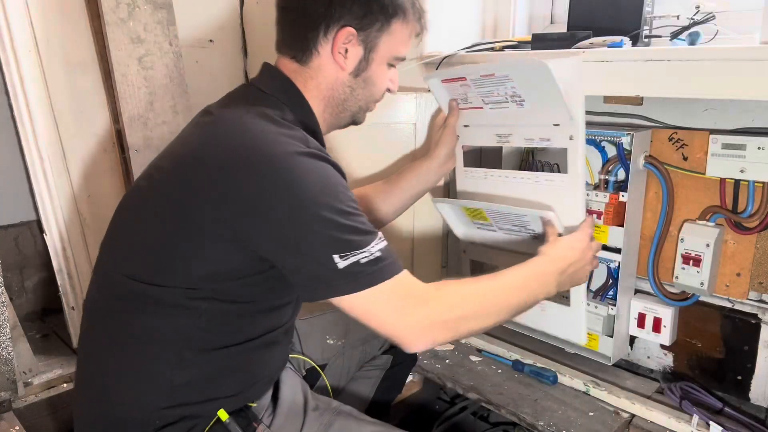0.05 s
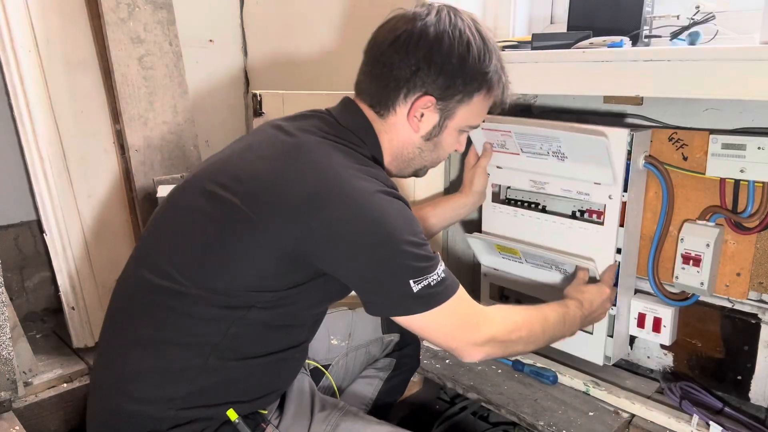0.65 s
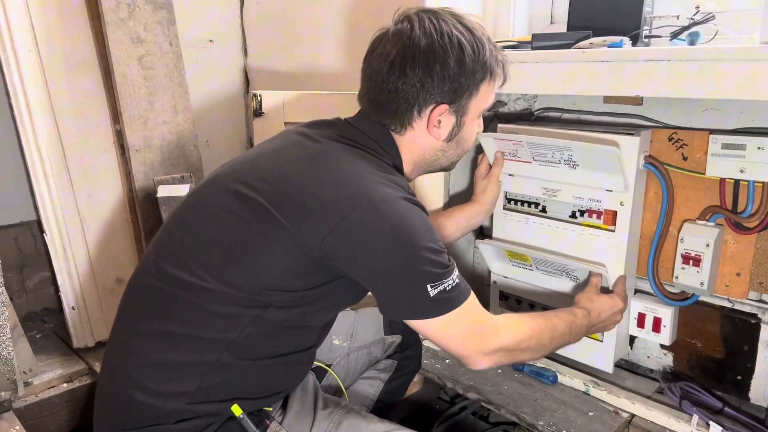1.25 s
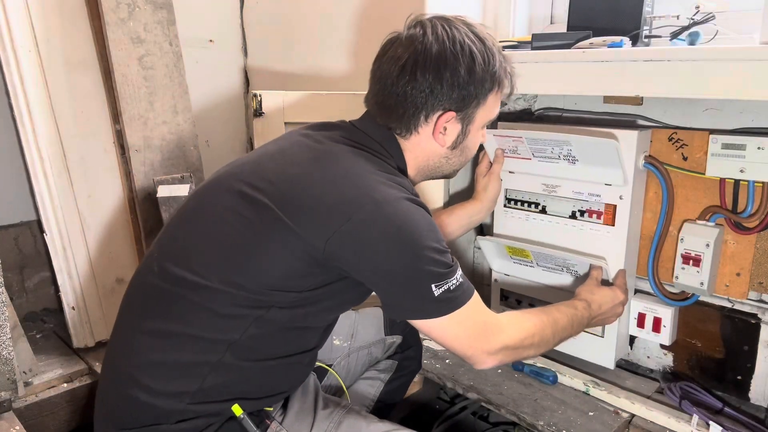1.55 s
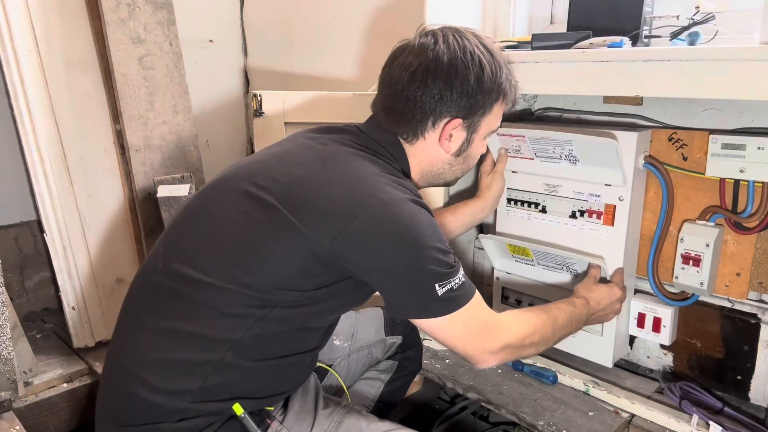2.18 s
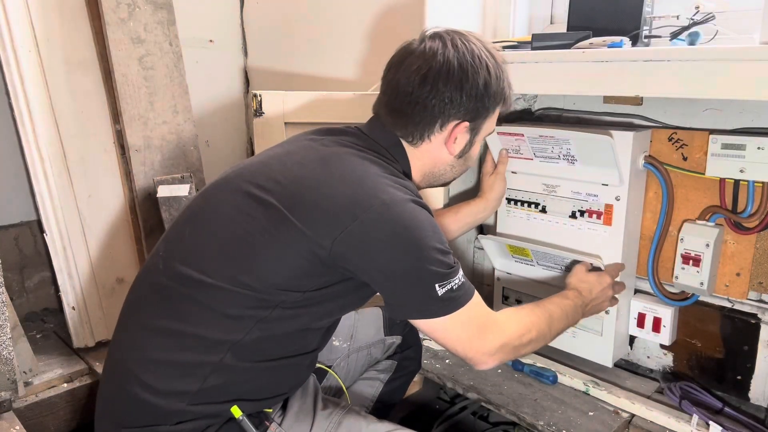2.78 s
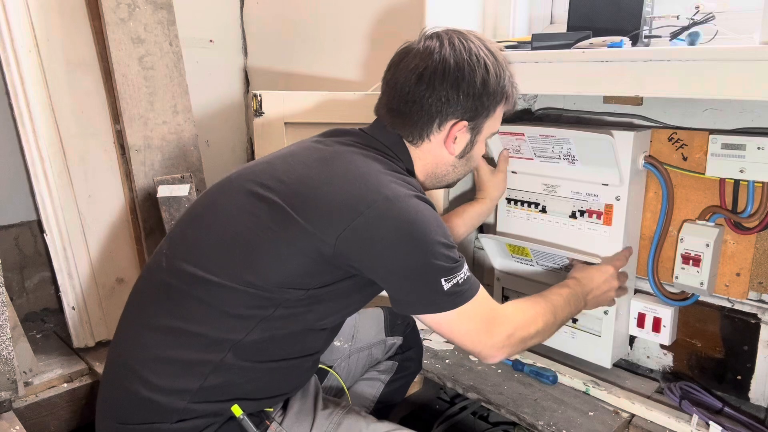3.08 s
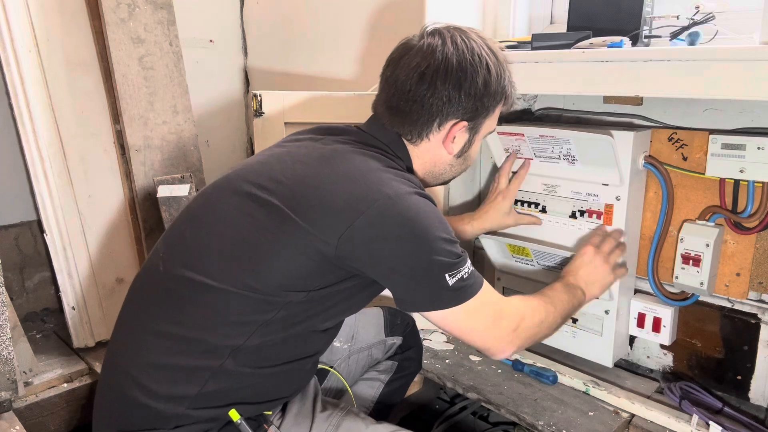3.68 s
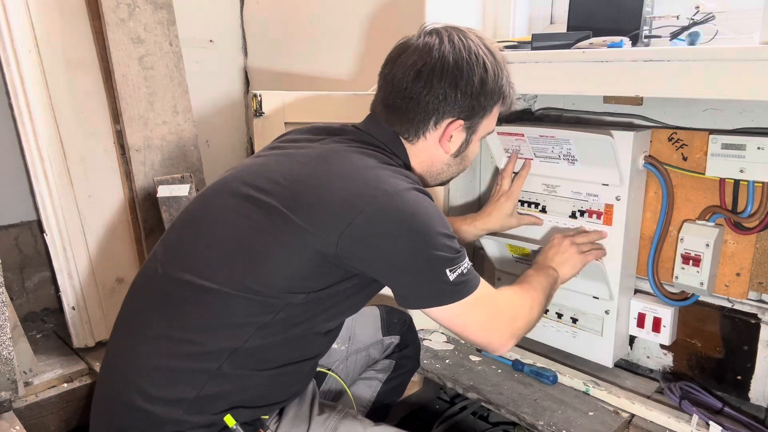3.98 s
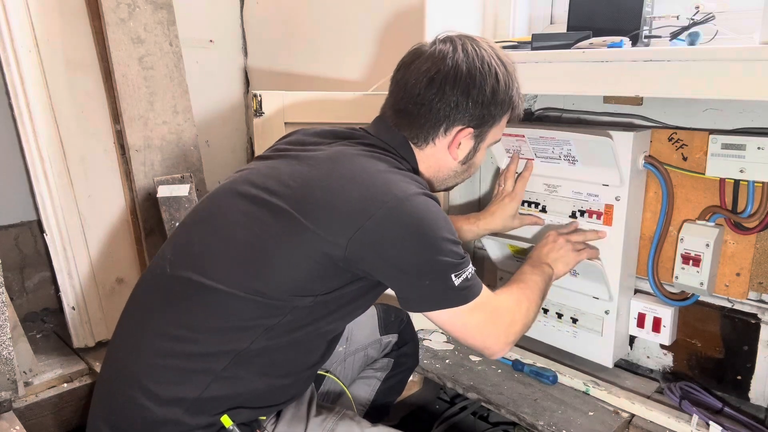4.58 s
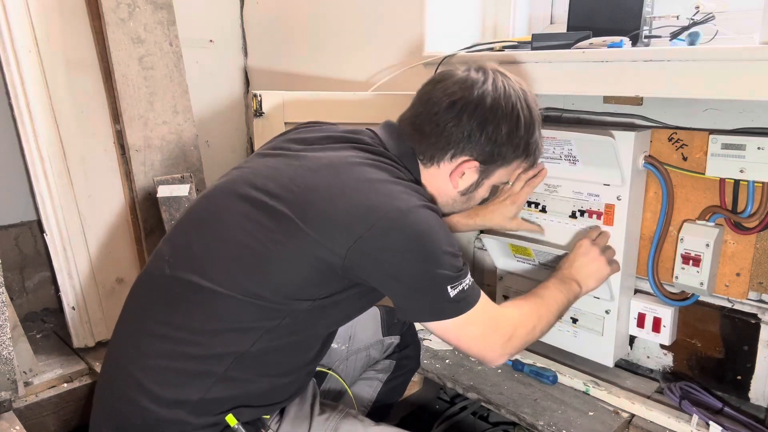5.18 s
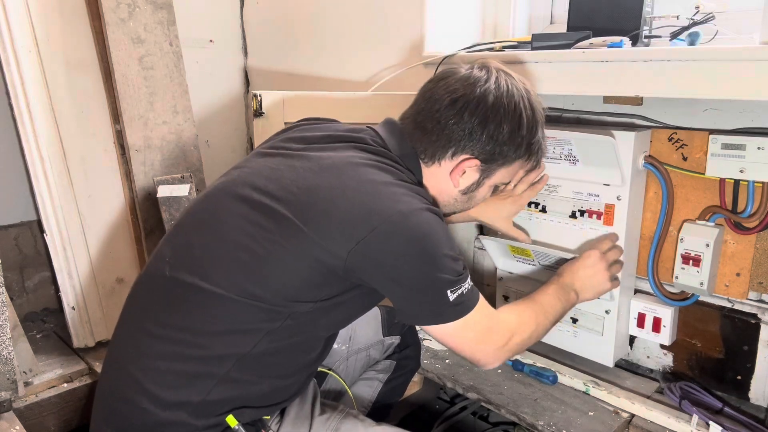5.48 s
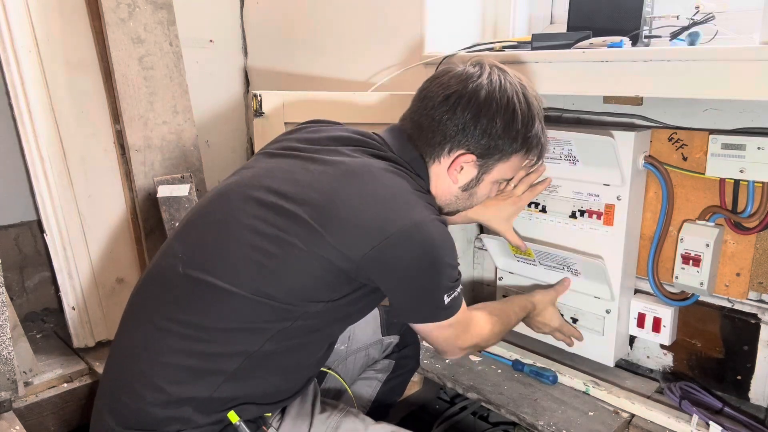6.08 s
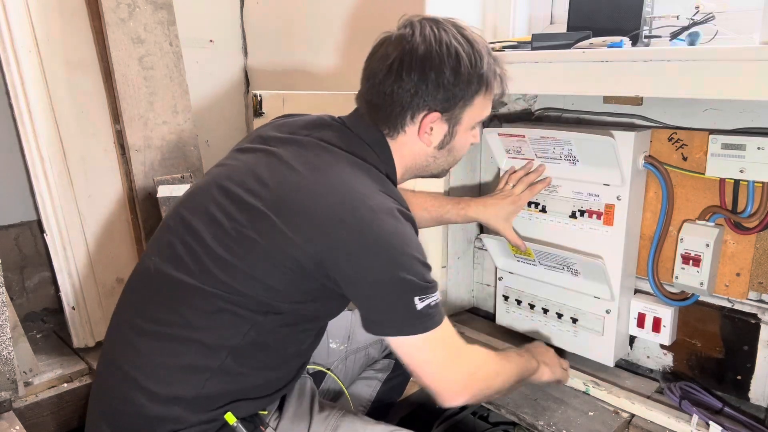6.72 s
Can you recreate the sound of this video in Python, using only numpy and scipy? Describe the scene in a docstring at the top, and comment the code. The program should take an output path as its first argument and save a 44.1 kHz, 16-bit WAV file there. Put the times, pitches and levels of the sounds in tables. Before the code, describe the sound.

A plastic cover taps and scrapes against a fuse box, bangs into place, then a small lid snaps shut in a bare room.

```python
"""A plastic cover scrapes, knocks, groans and bangs home on a wall-mounted fuse box in a small bare room.
Its hinged lid clicks and snaps shut, a hand tool knocks on the boards, and the floor thuds under a knee.
Each impact is a broadband excitation shaped by the resonances of the struck body; a harder blow tilts
the spectrum towards the treble. Stick-slip friction makes the groans, and freely decaying modes ring on.
Sleeves rustle between the blows and a faint squeak glides twice, over quiet room tone and hiss."""
import sys
import numpy as np
from scipy import signal
from scipy.fft import rfft, irfft, next_fast_len
from scipy.io import wavfile
from scipy.ndimage import map_coordinates

SR = 44100
rng = np.random.default_rng(int(sys.argv[2]) if len(sys.argv) > 2 else 0)


def waveform_to_disk(signal):
    """Save audio, clipped to [-1, 1], as 16-bit WAV at the path in sys.argv[1]."""
    frames = np.transpose(np.atleast_2d(signal))
    scaled = np.clip(frames, -1, 1) * 32767
    samples = np.round(scaled).astype(np.int16)
    wavfile.write(sys.argv[1], SR, samples)


N = 302085

# Knocks and soft slides of the cover, snaps of the lid, and the tool on the boards.
# Each row: start in seconds, level in dB, hardness in dB per octave, rattle t60 in seconds.
KNOCKS = [(.003, -12.5, 1.5, 0.0067), (.03, -25.5, 2.5, 0.12), (1.868, -34, -0.5, 0.74),
          (2.045, -35, -1, 0.069), (2.138, -25, 1.07, 0.13), (2.187, -24.5, 0.6, 0.046),
          (2.333, -36, -1.5, 0.31), (2.372, -28, -0.5, 0.12), (2.936, -34, -1.5, 0.22),
          (2.976, -27, 1.8, 0.073), (3.136, -33, -1.5, 0.12), (3.28, -38, -1.5, 0.047),
          (3.46, -44, -7.5, 0.044), (3.77, -43.5, -6, 0.21), (4.11, -36, -4.5, 0.04),
          (4.272, -30, -0.5, 0.044), (4.49, -13.5, 1, 0.29), (4.522, -5.5, -1, 0.076),
          (4.543, -11.5, -1.5, 0.084), (4.561, -15.5, -3.5, 0.019), (4.598, -7, 1.34, 0.04),
          (4.616, -15, 2.5, 0.023), (4.945, -19, 1.5, 0.027), (5.09, -20.5, 1.13, 0.1),
          (5.132, -17, -0.5, 0.03)]
SLIDES = [(.223, -38.5, 0.5, 0.28), (4.873, -23, -1.5, 0.12), (5.373, -37, 2.5, 1)]
LID_SNAPS = [(5.489, -25, -1, 0.31), (5.505, -16, -1.8, 0.046), (5.9, -44.5, -4, 0.43),
             (5.938, -20.5, -1, 0.13), (5.948, -9.5, 0.5, 0.042)]
TOOL_KNOCKS = [(6.645, -27.5, 1.8, 0.032), (6.66, -30.5, -0.5, 0.08), (6.698, -37, -2.5, 0.026)]
# Edges catch, or scrape along the box. Each row: start in seconds, level in dB, rattle t60 in seconds.
CLICKS = [(2.37, -31.5, 0.12), (3.22, -41, 0.1), (3.766, -43.5, 0.14), (4.272, -41, 0.033),
          (4.522, -7.5, 0.14), (4.6, -12.5, 0.23), (5.108, -47, 0.016)]
SCRAPES = [(.825, -47, 0.54), (.869, -33.5, 0.15), (.92, -43.5, 0.15), (3.429, -32, 0.095),
           (3.519, -27.5, 0.054)]
# Light taps on the cover, and palm shoves that make the box boom. Each row: start in seconds, level in dB.
TAPS = [(.008, -17.5), (1.671, -31.5), (1.905, -25), (2.14, -18), (2.941, -26.5), (3.136, -34),
        (3.998, -39.5), (4.028, -37.5), (4.11, -28.5), (4.249, -32.5), (4.5225, -4), (4.528, -10),
        (4.543, -8), (4.618, -5)]
SHOVES = [(1.977, -21), (2.405, -22), (4.272, -19.5), (4.542, -9), (4.615, -5.5), (4.969, -15.5),
          (5.132, -11.5)]
# Blows that leave a part ringing: the cover as it seats, a small metal part, the catch of the lid.
# Each row: start in seconds, level in dB, hardness in dB per octave.
BANGS = [(4.544, -19.5, 0.5), (4.605, -22.5, -3.5)]
PINGS = [(1.669, -54.5, 7.5), (1.906, -36, -1.5)]
CATCHES = [(5.491, -56, -1), (5.949, -37.5, -0.5), (6.159, -31, -13)]
# Hollow thuds of the pressed cover and, last, of the floor.
# Each row: start in seconds, frequency in Hz, level in dB, t60 in seconds.
THUDS = [(2.205, 871, -37, 0.34), (2.376, 366, -19, 0.076), (2.403, 429, -32, 0.33),
         (2.979, 307, -34.5, 0.48), (3.775, 181.5, -38, 0.11), (4.25, 283.4, -36, 0.15),
         (4.524, 292, -13.5, 0.28), (4.946, 253.7, -23.5, 0.33), (5.504, 250.8, -23, 0.3),
         (5.504, 304.5, -26.5, 0.33), (6.459, 163, -41, 0.16), (6.528, 150, -40, 0.146)]
# An edge binds on the box. Each row: start in seconds, length in seconds, pitch in Hz, level in dB.
GROANS = [(0.236, 0.14, 587, -57), (1.88, 0.25, 403.3, -41.5), (2.143, 0.096, 423, -40.5)]
# Sleeves and hands brush the plastic. Each row: start in seconds, length in seconds, level in dB.
RUSTLES = [(0.199, 0.53, -66), (2.642, 0.28, -64.5), (3.299, 0.41, -63), (4.063, 0.52, -66.5),
           (6.267, 0.26, -71)]
# High squeaks. Each row: start in seconds, length in seconds, first and last pitch in Hz, level in dB.
SQUEAKS = [(1.07, 0.18, 11800, 12600, -70), (1.518, 0.17, 11600, 9500, -73)]

# Resonances of the cover (deep, then upper), the lid and the tool on the boards.
# Each row: centre in Hz, bandwidth in Hz, lift in dB.
COVER_MODES = [(145, 9, 9), (189, 11, 6), (253, 13, 8), (291, 12, 8), (361, 11, 7), (430, 16, 4),
               (564, 14, 8), (661, 13, 9), (727, 15, 9), (883, 9, 12)]
FACE_MODES = [(1833, 14, 7), (2894, 20, 5), (3580, 16, 6), (5955, 24, 7), (7588, 12, 8)]
LID_MODES = [(400, 110, 6), (1060, 200, 5), (2930, 330, 8), (3908, 60, 5)]
TOOL_MODES = [(523, 65, 6), (1008, 24, 20), (1085, 45, 16), (1350, 110, 13), (2370, 560, 12),
              (3800, 500, 7)]
# Free modes of the ringing parts. Each row: frequency in Hz, relative level in dB, t60 in seconds.
BANG_MODES = [(189.8, -1, .38), (365, 0, .26), (724, 4.5, 0.22), (883, 0, 0.47), (1206, -12, .45),
              (3100, -11, .45)]
PING_MODES = [(1308, 0, 0.25), (1523, -1, .17), (1976, -10, 0.45), (4255, -20, 0.45), (4370, -18, 0.25)]
CATCH_MODES = [(968, -9, 0.3), (1123, 1, 0.13), (2795, -9.5, .4), (2972, -6.5, .4), (3082, -10, .4),
               (4595, -5, .08)]

# Spectral envelopes of the contacts and noises. Each row: frequency in Hz, relative level in dB.
KNOCK_COLOUR = [(25, -46), (55, 2), (140, -1.5), (290, 4.5), (700, 1.5), (1300, -4), (2800, -3),
                (8500, -21), (12500, -33.5), (15500, -45)]
CLICK_COLOUR = [(25, -42.5), (55, -7), (290, -10.5), (880, -10.5), (2800, 0.5), (6000, -4), (8500, -7),
                (12500, -15.5), (15500, -25)]
TAP_COLOUR = [(25, -40.5), (290, -15), (1200, -2.5), (3200, -11.5), (15500, -57)]
SHOVE_COLOUR = [(25, -34.5), (55, 0), (90, 1), (290, -7.5), (880, -25.5), (15500, -76.5)]
SLIDE_COLOUR = [(25, -39.5), (55, -1.5), (290, 4.5), (2800, -8.5), (8500, -21), (15500, -34.5)]
SCRAPE_COLOUR = [(200, -17.5), (700, -12), (2200, -9), (3300, -2.5), (5500, -10.5), (8500, -12.5),
                 (15000, -27)]
LID_COLOUR = [(25, -29.5), (55, -1), (240, -3), (1700, -1), (2800, 0), (4800, 0), (6300, -6.5),
              (8500, -7.5), (12500, -21.5), (15500, -37.5)]
FLOOR_COLOUR = [(25, -45), (55, -0.5), (290, 4.5), (2800, -7), (8500, -28.5), (15500, -57)]
RUSTLE_COLOUR = [(500, 0.5), (5500, -6.5), (7500, -6), (9500, -3), (11500, -12.5), (15000, -23)]
ROOM_TONE_COLOUR = [(25, -19), (55, -3.5), (210, -20.5), (550, -16.5), (1140, -31.5), (6600, -69)]
HISS_COLOUR = [(200, -3), (1000, -10), (5500, -10.5), (8500, -8), (15000, -29.5)]

# Reverberation time of the room. Each row: frequency in Hz, t60 in seconds.
ROOM_T60 = [(90, 0.65), (290, 0.82), (880, 0.55), (2800, 0.51), (8500, 0.5), (15000, 0.027)]
# Stereo width: wide in the middle, centred in the bass and top treble.
# Each row: frequency in Hz, left-right correlation.
COHERENCE = [(100, .92), (280, .76), (620, .02), (900, .45), (3000, .25), (6500, .3), (7600, .92),
             (15000, .92)]
# Stereo phase: the left channel lags the right. Each row: frequency in Hz, lag in radians.
STEREO_LAG = [(100, .05), (900, .15), (2900, .6), (4500, 1.7), (5500, 3.4), (7300, 6.2), (9400, 6.4),
              (12100, 12.4)]
# Stereo balance. Each row: frequency in Hz, left minus right in dB.
STEREO_BALANCE = [(300, 1.65), (1500, 0.6), (4000, 2), (6300, 2.5), (7600, 0)]

PIVOT_HZ, BASS_HZ, TREBLE_HZ = 785, 150, 4500  # hardness tilts about the pivot, between bass and treble


def cover(tap_t60=0.05, shove_t60=0.05):
    """Forced vibration: contacts drive all the cover's modes; the lid's snaps reach only the deep ones."""
    knocks = contacts(KNOCKS, KNOCK_COLOUR,
                      chatter_db=3.5, wet=2.27, softness=0.018, crack=0.94, crack_t60=0.012)
    clicks = contacts([(s, db, 0, t60) for s, db, t60 in CLICKS], CLICK_COLOUR,
                      chatter_db=0.5, wet=1, softness=0.013, crack=1, crack_t60=0.075)
    taps = contacts([(s, db, 0, tap_t60) for s, db in TAPS], TAP_COLOUR,
                    chatter_db=3, wet=1.5, softness=0.03, crack=1, crack_t60=0.02, impact=7)
    shoves = contacts([(s, db, 0, shove_t60) for s, db in SHOVES], SHOVE_COLOUR,
                      chatter_db=4.5, wet=3.3, softness=0.015, crack=0.93, crack_t60=0.029)
    slides = contacts(SLIDES, SLIDE_COLOUR, chatter_db=3, wet=1.22, softness=0.13)
    scrapes = contacts([(s, db, 0, t60) for s, db, t60 in SCRAPES], SCRAPE_COLOUR,
                       chatter_db=3, wet=1.3, softness=0.04)
    face = panel(knocks + clicks + taps + shoves + slides + scrapes, FACE_MODES, ripple_db=3.5)
    return panel(face + lid(), COVER_MODES, ripple_db=1.5)


def lid():
    """Impact excitation: the small lid snaps onto its catch and drives its own broad resonances."""
    snaps = contacts(LID_SNAPS, LID_COLOUR,
                     chatter_db=0, wet=0.7, softness=0.022, crack=0.66, crack_t60=0.06)
    return panel(snaps, LID_MODES, ripple_db=4)


def contacts(rows, colour, chatter_db, wet, softness, crack=0, crack_t60=0.01, impact=0, spot_db=2.6):
    """Source and filter: impulse, crack, edge chatter and reverberation share a hardness-tilted colour."""
    out = np.zeros((2, N))
    t = np.arange(SR * 3 // 4) / SR
    for s, db, hardness, rattle_t60 in rows:
        decay = fade(t, rattle_t60)
        chatter = diffuse(len(t), unit(amp(chatter_db * wobble(len(t), 700))) * decay)
        strike = crack * fade(t, crack_t60) * rng.standard_normal(len(t))
        reverb = np.sqrt(wet * rattle_t60 * (1 - decay ** 2)) * room_tail(len(t))
        rise = 1 - np.exp(-t / (softness * rattle_t60))  # long, sliding contacts start gently
        blow = rise * (chatter + strike + reverb) + impact * (t == 0)

        def response(hz):
            tilt = hardness * np.log2(np.clip(hz, BASS_HZ, TREBLE_HZ) / PIVOT_HZ)
            # each struck spot favours other groups of upper modes
            spot = map_coordinates(rng.standard_normal(SR // 160), [hz / 90]) * hz / (hz + 800)
            return minimum_phase(along(colour, hz) + tilt + spot_db * spot)
        add(out, s, amp(db) * filtered(blow, response))
    return out


def panel(x, modes, ripple_db, level_db=0):
    """Resonance: a panel lifts its main modes above a dense ripple of lesser ones."""
    def response(hz):
        power = 1 + sum((amp(db) ** 2 - 1) / (1 + (2 * (hz - centre) / width) ** 2)
                        for centre, width, db in modes)
        lesser = np.tanh(map_coordinates(rng.standard_normal(SR // 32), [hz / 22], mode="nearest"))
        ripple = ripple_db * lesser * hz / (hz + 700)
        return minimum_phase(10 * np.log10(np.abs(power)) + ripple + level_db)
    return filtered(x, response)


def ringing_parts():
    """Modal superposition: a blow excites all of a part's modes; a harder one favours the upper ones."""
    parts = [(PINGS, PING_MODES), (BANGS, BANG_MODES), (CATCHES, CATCH_MODES)]
    struck = [(s, hz, db + mode_db + hardness * np.log2(hz / PIVOT_HZ), t60)
              for blows, modes in parts
              for s, db, hardness in blows
              for hz, mode_db, t60 in modes]
    return damped_modes(struck, attack_s=0.00091, blur=1)


def thuds():
    """Free vibration: the pressed cover or the floor sounds one hollow mode for each thud."""
    return damped_modes(THUDS, attack_s=0.0026, blur=0.94)


def damped_modes(rows, attack_s, blur):
    """Damped oscillation: each mode decays exponentially while the room blurs its phase."""
    out = np.zeros((2, N))
    t = np.arange(SR // 2) / SR
    for s, hz, db, t60 in rows:
        coherence = np.clip(along(COHERENCE, hz), 0, 1)
        common = np.sqrt(coherence) * wobble(len(t), 146)
        separate = np.sqrt(1 - coherence) * np.array([wobble(len(t), 194), wobble(len(t), 160)])
        offset = (1 - coherence) * rng.standard_normal((2, 1))  # standing waves shift each side's phase
        envelope = amp(db) * fade(t, t60) * (1 - np.exp(-t / attack_s))
        add(out, s, envelope * np.sin(2 * np.pi * hz * t + offset + blur * (common + separate)))
    return out


def floorboards():
    """Impact and rebound: a hard tool strikes the resonant boards and bounces twice."""
    knocks = contacts(TOOL_KNOCKS, FLOOR_COLOUR, chatter_db=3, wet=3.2, softness=0.007, impact=15)
    return panel(knocks, TOOL_MODES, ripple_db=3, level_db=-2.5)


def groans(second_db=-13, third_db=-19, jitter=0.018):
    """Stick-slip friction: a binding edge vibrates unevenly at the panel's pitch, in three harmonics."""
    out = np.zeros(N)
    for s, length, hz, db in GROANS:
        t = np.arange(round(length * SR)) / SR
        phase = 2 * np.pi * np.cumsum(hz * (1 + jitter * wobble(len(t), 110))) / SR
        tone = np.sin(phase) + amp(second_db) * np.sin(2 * phase) + amp(third_db) * np.sin(3 * phase)
        add(out, s, amp(db + 1.8 * wobble(len(t), 60)) * swell(t, length, power=0.3) * tone)
    return out


def rustles(grain_db=3, uneven_db=5.5):
    """Friction noise: brushing fibres give a grainy hiss that swells with the arm's uneven speed."""
    out = np.zeros((2, N))
    for s, length, db in RUSTLES:
        t = np.arange(round(length * SR)) / SR
        grain = amp(grain_db * wobble(len(t), 550))
        fibres = coloured_noise(len(t), RUSTLE_COLOUR, grain)
        add(out, s, amp(db + uneven_db * wobble(len(t), 22)) * swell(t, length) * fibres)
    return out


def squeaks(waver_hz=200):
    """Random modulation of pitch and amplitude roughens a thin, gliding tone."""
    out = np.zeros(N)
    for s, length, first_hz, last_hz, db in SQUEAKS:
        t = np.arange(round(length * SR)) / SR
        hz = np.linspace(first_hz, last_hz, len(t)) + waver_hz * wobble(len(t), 900)
        tone = np.sin(2 * np.pi * np.cumsum(hz) / SR)
        add(out, s, amp(db) * swell(t, length) * wobble(len(t), 150) * tone)
    return out


def room_tail(length):
    """Reverberation: a diffuse field dies away at a rate that depends on frequency."""
    hz, t, spectrum = signal.stft(diffuse(length), SR, nperseg=256)
    t60 = along(ROOM_T60, hz)[:, None]
    _, tail = signal.istft(spectrum * fade(t, t60) / np.sqrt(t60), SR, nperseg=256)
    return tail[:, :length]


def background(tone_db=-76, hiss_db=-76):
    """Stationary noise: low room tone and a faint hiss."""
    room_tone = amp(tone_db) * coloured_noise(N, ROOM_TONE_COLOUR)
    return room_tone + amp(hiss_db) * coloured_noise(N, HISS_COLOUR)


def coloured_noise(length, colour, envelope=1):
    """Spectral shaping of diffuse noise, at unit RMS."""
    return unit(filtered(diffuse(length, envelope), lambda hz: amp(along(colour, hz))))


def diffuse(length, envelope=1):
    """Partial coherence: white noise whose stereo width depends on frequency."""
    def weights(hz):
        angle = np.arccos(np.clip(along(COHERENCE, hz), -1, 1)) / 2
        return np.array([np.cos(angle), np.sin(angle)])
    mid, side = filtered(envelope * rng.standard_normal((2, length)), weights)
    return np.array([mid + side, mid - side])


def minimum_phase(db):
    """Causality: a response with this gain in which nothing sounds before the blow."""
    cepstrum = irfft(np.log(amp(db) + 1e-6))
    half = len(cepstrum) // 2
    cepstrum[1:half] *= 2
    cepstrum[half + 1:] = 0
    return np.exp(rfft(cepstrum))


def filtered(x, response):
    """Linear filtering: the spectrum of x times a response of frequency."""
    size = 2 * next_fast_len(x.shape[-1] // 2 + 4096)
    hz = np.fft.rfftfreq(size, 1 / SR)
    return irfft(rfft(x, size) * response(hz), size)[..., :x.shape[-1]]


def amp(db):
    """Decibels as an amplitude ratio."""
    return 10 ** (np.asarray(db) / 20)


def unit(x):
    """Normalisation to unit RMS."""
    return x / np.sqrt(np.mean(x ** 2) + 1e-20)


def along(points, hz):
    """Interpolation of (Hz, value) points on a log frequency axis."""
    frequencies, values = np.transpose(points)
    return np.interp(np.log(hz + 1), np.log(frequencies + 1), values)


def fade(t, t60):
    """Exponential decay by 60 dB in t60 seconds."""
    return 1000.0 ** (-t / t60)


def swell(t, length, power=0.5):
    """A flattened sine arch: it sets in quickly, holds and lets go."""
    return np.abs(np.sin(np.pi * t / length)) ** power


def wobble(length, rate):
    """Smooth random fluctuation with rate knots a second."""
    knots = rng.standard_normal(int(length * rate / SR) + 4)
    return map_coordinates(knots, [np.arange(length) * rate / SR])


def add(track, s, sound):
    """Superposition of a sound on the track from s seconds."""
    start = max(round(s * SR), 0)
    part = track[..., start:start + sound.shape[-1]]
    part += sound[..., :part.shape[-1]]


def scene():
    """Superposition: the pressures of all the sources add in the room."""
    blows = thuds() + cover() + floorboards()
    return blows + groans() + ringing_parts() + rustles() + squeaks() + background()


def record(dry, ceiling=0.72, top_hz=15700):
    """Stereo phase and balance: the left lags and is louder; peaks saturate and the band is limited."""
    def stereo(hz):
        share = np.array([[0.5], [-0.5]])  # split evenly, in opposite senses, between left and right
        return amp(along(STEREO_BALANCE, hz)) ** share * np.exp(-1j * along(STEREO_LAG, hz) * share)
    heard = filtered(dry, stereo)
    rounded = heard / (1 + np.abs(heard / ceiling) ** 6) ** (1 / 6)
    return filtered(rounded, lambda hz: 1 / np.sqrt(1 + (hz / top_hz) ** 160))


dry = scene()
out = record(dry)
waveform_to_disk(out)
```